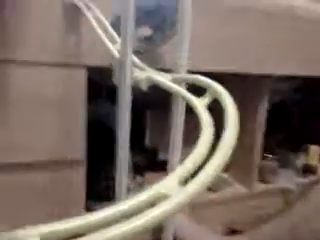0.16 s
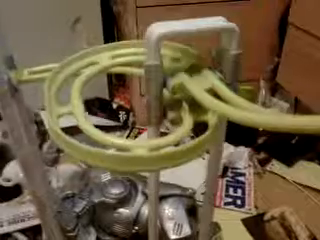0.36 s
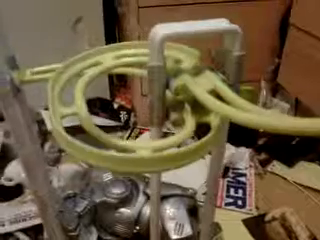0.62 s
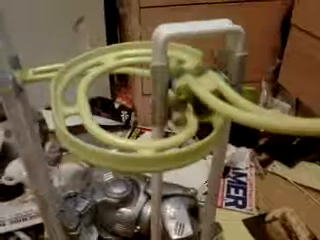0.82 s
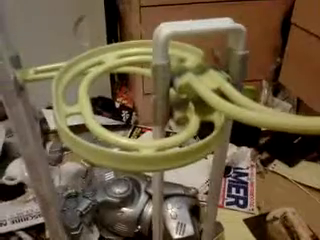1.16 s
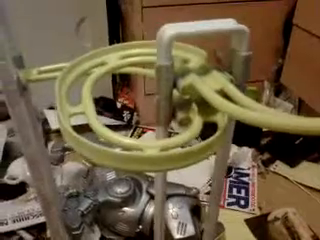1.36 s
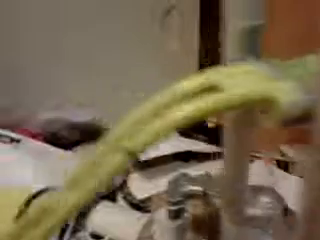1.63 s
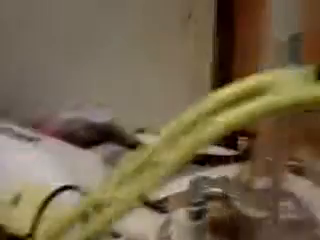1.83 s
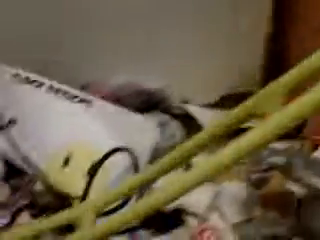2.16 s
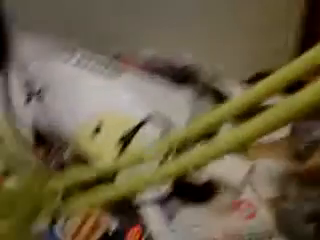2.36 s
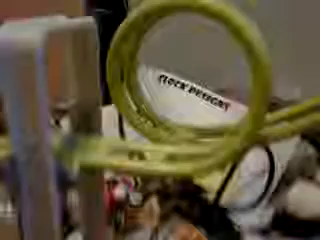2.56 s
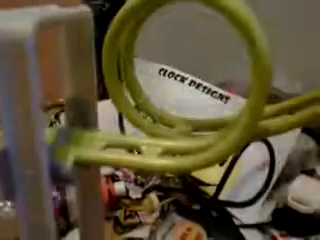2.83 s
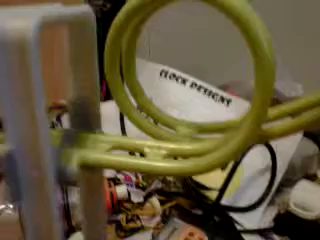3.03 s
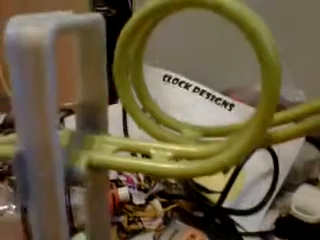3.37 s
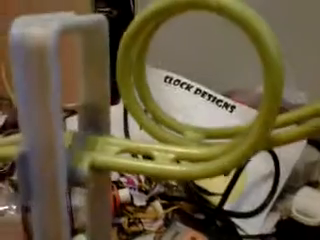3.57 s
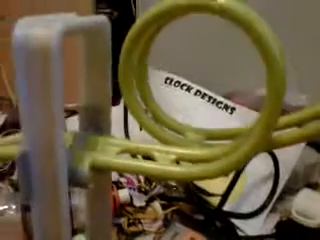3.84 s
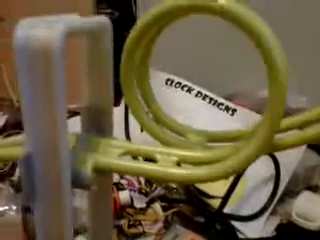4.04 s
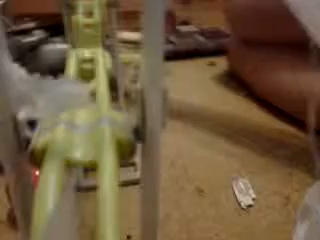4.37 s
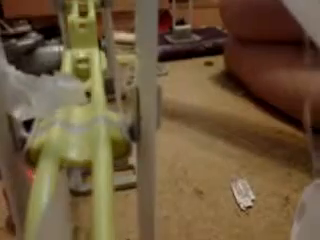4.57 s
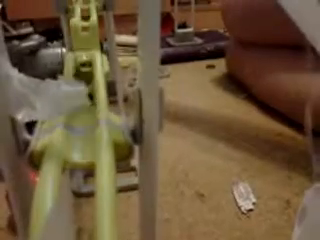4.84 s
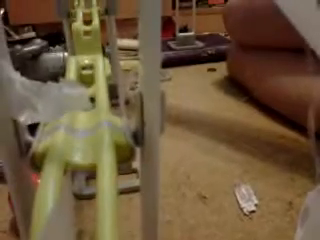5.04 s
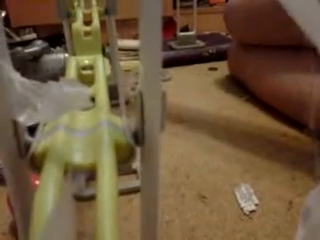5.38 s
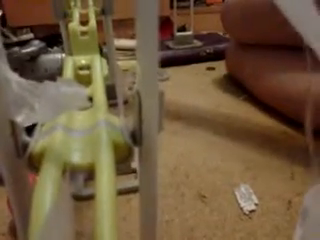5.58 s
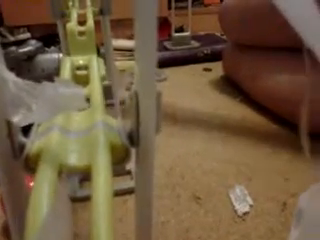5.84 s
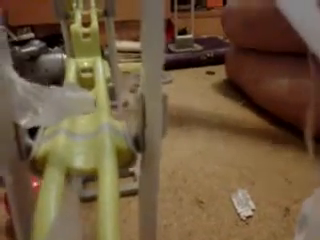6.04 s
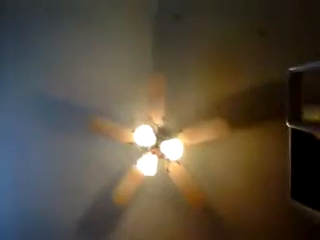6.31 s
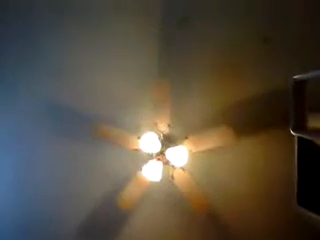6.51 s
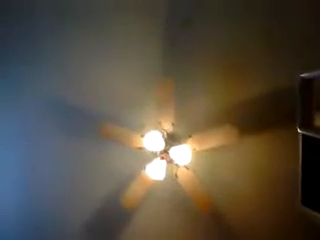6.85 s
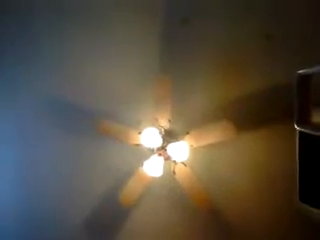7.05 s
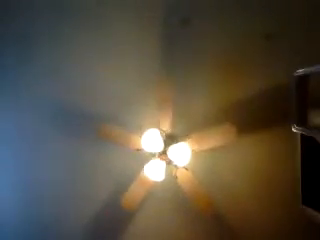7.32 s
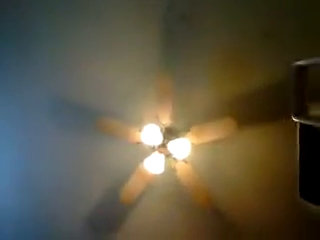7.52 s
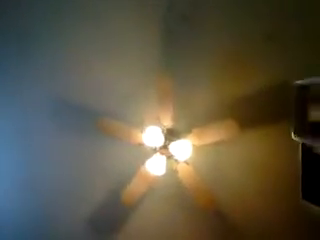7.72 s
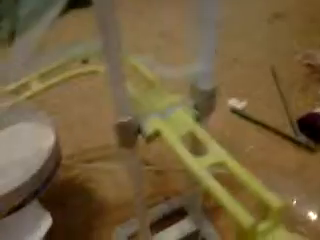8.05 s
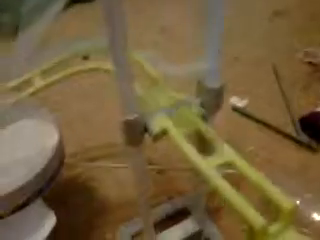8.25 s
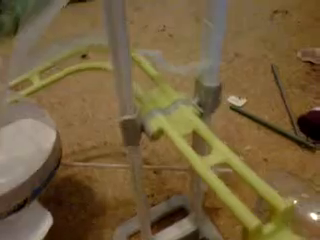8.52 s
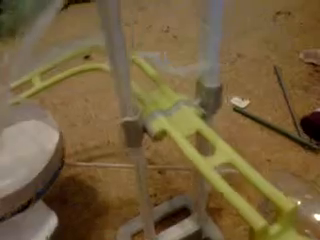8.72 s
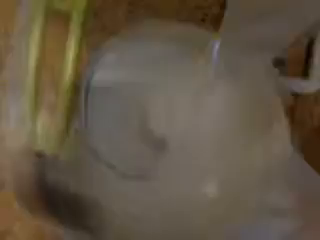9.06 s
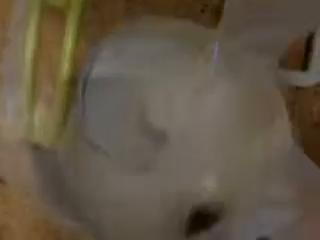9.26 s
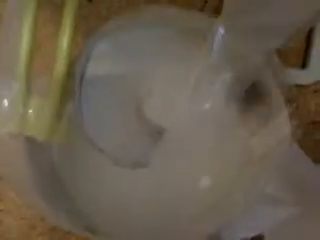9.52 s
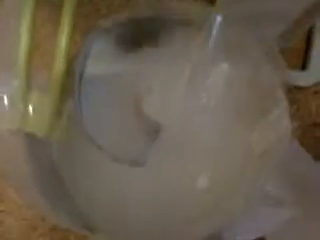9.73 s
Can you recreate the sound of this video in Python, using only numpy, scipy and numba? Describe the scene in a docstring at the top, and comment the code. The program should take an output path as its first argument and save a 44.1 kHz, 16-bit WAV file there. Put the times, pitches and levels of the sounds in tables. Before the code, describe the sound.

In a small cluttered room, a marble rolls down plastic rails with a grainy, hollow rattle that swells and fades. Sparse clicks come first, then a dense burst of hard clacks around the middle. Handling thumps on the camera follow, then more rattling and clacks, and finally a softer, duller roll around a bowl. The close handheld microphone sounds narrow and slightly muffled, over faint air and hiss.

```python
"""Marble on a toy track, hand-held camera

Small room, one microphone in the camera: a marble runs down plastic rails and ends circling a bowl.
Its rolling is a stream of tiny random impacts that ring the rails, coloured stretch by stretch.
At joints and drops it skips and clacks: a contact with chatter and room echo rings each spot's own resonances.
At no distance at all, fingers knock and rub on the case: short rings and trains of slips, both dry.
A dull pop, a small step and a swell of pressure, opens each new shot; faint air and hiss lie beneath.
"""
import sys
import numpy as np
from scipy import signal
from scipy.fft import rfft, irfft
from scipy.io import wavfile
from scipy.ndimage import uniform_filter1d
from numba import njit

SR = 44100
rng = np.random.default_rng(int(sys.argv[2]) if len(sys.argv) > 2 else 0)


def unload_audio(sound):
    """Save the sound as a 16-bit wav file, at the path given as the first command line argument."""
    columns = np.transpose(np.atleast_2d(sound))
    # keep every value between -1 and 1, then stretch to whole-number steps
    steps = np.round(np.clip(columns, -1, 1) * 32767)
    wavfile.write(sys.argv[1], SR, steps.astype(np.int16))


N = 436149
HIT = 16384  # length of one blow in samples
AGE = np.arange(HIT) / SR  # seconds since a blow
TIME = np.arange(N) / SR
TOP_HZ = 7500  # top of the band the microphone hears


def undb(db):
    """Decibels to gain."""
    return 10 ** (np.asarray(db) / 20)


def unit(x):
    """Scale to an energy of one."""
    return x / np.sqrt(np.sum(x ** 2) + 1e-18)


def level(x, db):
    """Scale to an rms level."""
    return unit(x) * np.sqrt(len(x)) * undb(db)


def add(out, s, x):
    """Mix x into out from time s."""
    i = max(int(s * SR), 0)
    out[i:i + len(x)] += x[:max(N - i, 0)]


def through(x, response):
    """Pass x through an impulse response."""
    return signal.fftconvolve(x, response)[:len(x)]


def butter(x, hz, kind, order=2):
    """Plain low-pass or high-pass."""
    return signal.sosfilt(signal.butter(order, hz, kind, fs=SR, output="sos"), x)


def steep(x, hz):
    """Steep low-pass."""
    return signal.sosfilt(signal.ellip(10, .2, 70, hz, fs=SR, output="sos"), x)


def colour(x, points, size=2048):
    """Causal filter whose gain follows (Hz, dB) points."""
    hz, db = np.transpose(points)
    bins = np.log(np.fft.rfftfreq(size, 1 / SR) + 1)
    gain = undb(np.interp(bins, np.log(hz), db))
    # folding the cepstrum gives minimum phase, so nothing sounds before the blow
    cepstrum = irfft(np.log(gain))
    cepstrum[1:size // 2] *= 2
    cepstrum[size // 2 + 1:] = 0
    return through(x, irfft(np.exp(rfft(cepstrum))))


def walk(count, rate):
    """Smooth chance with a spread near one, taking `rate` new values a second."""
    steps = np.arange(count) * rate / SR
    return np.interp(steps, np.arange(4096), rng.standard_normal(4096))


def grains(count, rate, spread_db):
    """Random tiny impacts of uneven size, `rate` a second on average."""
    happens = rng.random(count) < rate / SR
    return happens * rng.standard_normal(count) * undb(spread_db * rng.standard_normal(count))


def tail(t60):
    """Dense reflections dying away by 60 dB in t60 seconds."""
    return unit(rng.standard_normal(HIT) * undb(-60 * AGE / t60))


def resonance(hz, width, size=2048):
    """Response of one resonance, with a gain of one at its centre."""
    age = AGE[:size]
    ring = np.exp(-np.pi * width * age) * np.cos(2 * np.pi * hz * age)
    return np.pad(2 * np.pi * width / SR * ring, (0, HIT - size))


def body(modes, ring_db, detune):
    """Response of a struck thing: the contact itself plus its modes, detuned a little at random."""
    ring = np.zeros(HIT)
    for hz, width, db in modes:
        mode_hz = hz * (1 + detune * rng.standard_normal())
        ring += undb(db) * unit(np.exp(-np.pi * width * AGE) * np.cos(2 * np.pi * mode_hz * AGE))
    return unit((AGE == 0) + undb(ring_db) * ring)


def room(t60_low=0.26, t60_high=0.14, split_hz=650):
    """A small cluttered room, with its own decay for bass and treble."""
    low = butter(tail(t60_low), split_hz, "low", order=1)
    high = butter(tail(t60_high), split_hz, "high", order=1)
    return unit((low + high) * (1 - np.exp(-AGE / 0.0023)))


def blow(x, tone, tilt_hz, weight_db, hardness_db):
    """Colour a blow: a heavier one has more bass, a harder one more treble."""
    return colour(colour(x, tone), list(zip(tilt_hz, (weight_db, 0, hardness_db))))


# Colour of the air in the small room. Each row: frequency in Hz, gain in dB.
QUIET_TONE = [(18, -48.5), (30, -21.5), (85, -3.5), (115, -3), (155, -5), (296, -8.5), (340, -4.5),
              (390, -16), (459, -6.5), (7520, -37.5), (9780, -49), (16500, -120)]


def quiet_room(air_db=-67.5, waver_db=-2.0, hiss_db=-87.5, hiss_low_hz=1500, hiss_top_hz=4500):
    """Faint wavering air, as coloured noise, over steady band-limited microphone hiss."""
    air = level(colour(rng.standard_normal(N), QUIET_TONE), air_db)
    air = air * undb(waver_db * walk(N, rate=1.6))
    hiss = butter(butter(rng.standard_normal(N), hiss_low_hz, "high", order=1), hiss_top_hz, "low")
    return air + level(hiss, hiss_db)


def slips(length_s, slip_hz=365, jitter=.33, spread_db=2):
    """Skin sticks and lets go: an uneven train of pulses."""
    phase = np.cumsum(slip_hz * np.exp(jitter * walk(HIT, rate=slip_hz))) / SR
    pulses = np.diff(np.floor(phase), prepend=-1)
    return pulses * undb(spread_db * rng.standard_normal(HIT)) * (AGE < length_s)


# Ringing of the camera's case. Each row: frequency in Hz, width in Hz, level in dB.
CASE_MODES = [(360, 120, -8.5), (1190, 100, 0), (1650, 390, -6.5), (2780, 190, -0.5), (5440, 260, 14)]
# Fingers against the case, touching the microphone's housing; the row at 4.758 s is instead a dull thud that
# comes with the marble's clack just before it. # Each row: start in seconds, level in dB before colouring,
# weight (bass) in dB, hardness (treble) in dB, # pitch of the spot in Hz.
KNOCKS = [(0.273, -20, -22, -25, 2900), (0.288, -19.5, 9, -31, 1520), (0.3678, -17, -1, -37, 1560),
          (0.376, -11.5, -2, -32, 1800), (4.477, -2.5, 3, -16.5, 1440), (4.494, -20, 15.5, -6, 295),
          (4.5594, -37, 37.5, 8, 298), (4.758, -7, 19, -4.5, 300), (5.2949, 2.5, 10, -60, 395),
          (5.299, -12.5, 20, -23, 400), (5.427, -26, 31, -8, 300), (5.4613, -31.5, 37, -7, 298),
          (5.521, -23, 17, -9, 298), (6.0416, -34, 34, -10, 288), (6.1259, -5, -4.5, -19, 1960),
          (6.527, -4, -19.5, -16.5, 1800), (6.6911, -7.5, 4, -4, 5130), (7.077, -2.5, 13.5, -45, 1130),
          (7.1038, 3, -8, -33, 1150), (7.204, 17, -12, -52, 1064), (7.2078, 16, -0.5, -51, 1330),
          (7.307, 18, -10, -24.5, 1130), (7.309, 19, 0.5, -33, 1010), (7.3417, 7, 8.5, -44, 1200),
          (7.348, 2.5, 13.5, -63, 1194), (7.4576, 26.5, -4, -24.5, 1680), (7.9674, 7, 9, -31, 1250),
          (7.9827, -4.5, 9, -14, 1170), (7.995, -15, 13, -6, 1200), (8.012, -10.5, 13, -9, 1200)]
# Colour shared by all knocks. Each row: frequency in Hz, gain in dB.
KNOCK_TONE = [(50, -9), (280, -1), (780, -2.5), (1550, -2), (2950, 1.5), (5000, -1.5), (7500, -36.5)]
# Where weight and hardness act on a knock: bass in Hz, pivot in Hz, treble in Hz.
KNOCK_TILT_HZ = (280, 1630, 4900)
# Fingers slipping over the case. Each row: start in seconds, end in seconds, level in dB.
RUBS = [(7.076, 7.094, -29), (7.164, 7.201, -27), (7.203, 7.224, -25.5), (7.348, 7.361, -40)]
# Colour shared by all rubs. Each row: frequency in Hz, gain in dB.
RUB_TONE = [(90, -35.5), (290, 6.5), (550, -4.5), (1100, 6), (1700, -4.5), (2800, -17), (4000, -41),
            (7000, -66)]


def handling(spot_width_hz=435, spot_db=-6.5):
    """Knocks and stick-slip rubs reach the microphone through the case, so they are dry."""
    out = np.zeros(N)
    for s, db, weight_db, hardness_db, hz in KNOCKS:
        spot = unit(resonance(hz, spot_width_hz))
        case = body(CASE_MODES, ring_db=-7.0, detune=0.026)
        sound = case + undb(spot_db) * spot + tail(0.014) + undb(-30.0) * tail(0.065)
        add(out, s, undb(db) * blow(unit(sound), KNOCK_TONE, KNOCK_TILT_HZ, weight_db, hardness_db))
    for start, end, db in RUBS:
        case = body(CASE_MODES, ring_db=-22.0, detune=0.011)
        sound = colour(through(slips(end - start), case), RUB_TONE)
        add(out, start, unit(sound) * np.sqrt(abs(end - start) * SR) * undb(db))
    return out


# Stretches of the marble's rolling; a new row starts at a landing, a joint, a new shot
# or where the loudness trend changes.
# Each row: start in seconds, end in seconds, run-up in seconds, level in dB,
# speeding or slowing in dB per second, treble in dB relative to that level.
RUNS = [(0.389, 0.925, .01, -49, -20.5, -7.5), (0.931, 1.456, 0.0086, -56.5, 3, -11.5),
        (1.457, 1.634, 0.14, -55, -1, -2), (1.714, 2.33, 0.016, -61.5, -5, -19),
        (2.21, 2.739, .28, -52.5, 1.5, -4.5), (2.806, 3.146, 0.022, -57.5, 16, -2.5),
        (3.225, 3.251, 0.0075, -54, 9, 3), (3.414, 3.745, 0.0064, -50, -23.5, 0),
        (3.875, 4.496, .01, -68.5, 2, -8), (4.511, 4.666, .01, -50.5, 36.5, -8.5),
        (4.757, 4.797, 0.013, -56.5, -22, -9.5), (4.9, 4.987, .005, -42, -5, -8.5),
        (5.027, 5.202, 0.026, -41.5, -3, -1.5), (5.377, 6.187, .01, -59, 1, -10.5),
        (6.186, 6.412, .01, -69.5, 11.5, -10.5), (6.693, 7.193, 0.28, -51.5, 4, -6),
        (7.25, 7.317, .02, -52, -6.5, -3), (7.458, 7.523, .01, -53.5, 5, -0.5),
        (7.575, 7.75, 0.0038, -44.5, -22.5, -4), (7.919, 8.126, 0.011, -48.5, -5, -11.5),
        (8.199, 8.241, 0.0069, -51.5, 9, -9), (8.379, 8.719, 0.012, -47.5, -4, -14),
        (8.854, 9.248, 0.014, -65.5, 3, -3), (9.327, 9.89, .01, -62.5, 5.5, -14.5)]
# The roll swells over a bump or kink in the track. Each row: time in seconds, gain in dB.
BUMPS = [(.68, 2.5), (0.977, 13), (1.414, 8.5), (2.052, 18), (2.52, 5.5), (2.966, 6), (7.0, 4), (8.578, 4),
         (9.08, 0), (9.55, 5.5), (9.72, 7), (9.86, 2.5)]


def roll_gains(bump_s=0.032, dies_db_per_s=292, treble_growth=0.26):
    """Gains of the roll's bass and treble: each row fades in, follows a trend, swells on bumps, rings down."""
    swell_db = sum(db * np.exp(-((TIME - s) / bump_s) ** 2) for s, db in BUMPS)
    low, high = np.zeros(N), np.zeros(N)
    for start, end, run_up_s, db, db_per_s, treble_db in RUNS:
        here = slice(int(start * SR), int(end * SR) + HIT)
        age = TIME[here] - start
        ring_down_db = dies_db_per_s * np.maximum(TIME[here] - end, 0)
        change_db = db_per_s * age + swell_db[here] - ring_down_db
        drive = np.clip(age / run_up_s, 0, 1) * undb(change_db)
        # rows that overlap add as energies; a faster marble is brighter
        low[here] += (undb(db) * drive) ** 2
        high[here] += (undb(db + treble_db) * drive ** (1 + treble_growth)) ** 2
    return np.sqrt(low), np.sqrt(high)


def travelling(force, t60=0.044, scatter_db=-1, size=8192):
    """Waves echo between the joints of the rails in a pattern that shifts as the marble moves on."""
    out = np.zeros(N)
    window = np.sin(np.pi * np.arange(size) / size)
    for i in range(0, N - size // 2, size // 2):
        piece = force[i:i + size]
        echoes = (AGE == 0) + undb(scatter_db) * tail(t60)
        add(out, i / SR, signal.fftconvolve(piece * window[:len(piece)], echoes))
    return out


def ticks(rate=55, low_hz=700, high_hz=5000, width_hz=330, spread_db=3, tick_db=-9.0):
    """The marble taps the rails at random, and each spot it taps rings briefly at its own pitch."""
    out = np.zeros(N)
    for when, pitch, size in rng.random((int(rate * N / SR), 3)):
        ring = resonance(low_hz * (high_hz / low_hz) ** pitch, width_hz)
        add(out, when * N / SR, undb(spread_db * -np.log(size)) * ring)
    return level(out, tick_db)


def bending(x, lag_s=0.002038, lag_at_hz=1000, size=2048):
    """Bending waves carry the treble ahead of the bass, drawing each contact out into a short chirp."""
    hz = np.fft.rfftfreq(size, 1 / SR)
    turns = lag_s * np.sqrt(lag_at_hz) * (2 * np.sqrt(hz) - hz / np.sqrt(TOP_HZ))
    return through(x, irfft(np.exp(-2j * np.pi * turns))[:size // 2])


@njit
def band(x, hz, width):
    """Band-pass whose centre moves, with a gain of one at the centre."""
    y, b, low = np.empty(len(x)), 0., 0.
    for i in range(len(x)):
        g, k = np.tan(np.pi * hz[i] / SR), width / hz[i]
        v = (b + g * (x[i] - low)) / (1 + g * (g + k))
        b, low, y[i] = 2 * v - b, low + 2 * g * v, k * v
    return y


# A resonance of the rails slides as the marble travels between their supports, one curve per pass.
# Each row of a curve: time in seconds, frequency in Hz.
SLIDES = [
    [(0.45, 1120), (0.85, 844), (1.208, 720), (1.238, 1190), (1.502, 1070), (1.62, 1770)],
    [(2.3, 1200), (2.572, 1600), (3.212, 930), (3.224, 1150), (3.696, 1070), (3.72, 1500)],
    [(8.42, 1330), (8.528, 1630), (8.556, 1430), (8.62, 1514), (8.648, 1338), (8.72, 1530)],
]


def sliding(x, width_hz=360.0, slide_db=-3):
    """Lift the resonance that slides along with the marble."""
    out = x.copy()
    for curve in SLIDES:
        s, hz = np.transpose(curve)
        here = slice(int(s[0] * SR), int(s[-1] * SR))
        out[here] += undb(slide_db) * band(x[here], np.interp(TIME[here], s, hz), width_hz)
    return out


# Ringing of the plain rails, then of the pieces with a shape of their own.
# Each row: frequency in Hz, width in Hz, level in dB.
RAIL_MODES = [(483, 420, 2), (1353, 49, 8), (1800, 190, 2.5), (2600, 140, 6.5), (2850, 130, 2),
              (4176, 49, -8.5), (5087, 110, -3.5)]
RAMP_MODES = [(417, 16, 20), (642, 40, 16), (900, 84, 8.4)]
LOOP_MODES = [(1130, 41, 2.6), (1348, 42, 4.6), (2520, 160, 10.3), (5180, 250, 11)]
CHUTE_MODES = [(310, 320, 5.4), (1431, 49, 15), (2533, 55, 14), (2990, 86, 12), (3200, 60, 5),
               (3930, 90, 4), (4890, 120, 5.5)]
BOWL_MODES = [(637, 53, 11.5), (750, 78, 11.4), (825, 39, 8.5), (1236, 69, 13.6), (1366, 45, 13),
              (1500, 50, 9)]
# Colour of each stretch of track. Each row: frequency in Hz, gain in dB.
SPIRAL_TONE = [(50.0, -9), (212.0, -11), (398.0, 5.5), (481.0, -4.5), (790, 4), (1090, -5), (1320.0, 0),
               (3700, -29.5), (4300, -35.5), (5350.0, -32), (7500.0, -75)]
RAMP_TONE = [(50.0, -31), (330.0, -17), (398.0, 5), (1240.0, -3.5), (2040.0, -12), (2800.0, -10),
             (3180.0, -18), (4080.0, -19), (7500.0, -65)]
LOOP_TONE = [(50.0, -28.5), (106.0, 5.5), (257.0, 0.5), (546.0, 12), (702.0, 6.5), (1160.0, 6.5),
             (1720, 7.5), (2040.0, -4), (2470.0, -2.5), (3550, -7), (4400, -14.5), (5250.0, -22.5),
             (6750.0, -30.5), (7500.0, -58.5)]
CHUTE_TONE = [(50.0, -31), (106.0, -1.5), (291.0, -3), (398.0, 1), (702.0, -6.5), (848.0, -4),
              (1160.0, -5.5), (1900, -3), (3380.0, -7), (6000, -32), (7500.0, -50.5)]
RUNOUT_TONE = [(50.0, -22), (146.0, -0.5), (512.0, 1.5), (619.0, -3.5), (1800.0, -3.5), (3400, -16),
               (5000, -27.5), (7500.0, -51.5)]
BEND_TONE = [(50.0, -25), (106.0, -8.5), (199.0, -3.5), (273.0, -14), (620, 0), (961.0, -4), (1400.0, -1),
             (3180.0, -3), (4350.0, -11), (6340.0, -24), (7190.0, -60), (7500.0, -64.5)]
BOWL_TONE = [(29, -50.5), (50, -15), (285, -1.5), (461, -5), (730, 1), (1210, -12.5), (1560, -17),
             (2040, -35), (2740, -41), (7500, -71), (9750, -71.5), (16500, -120)]
# Where the marble is. Each row: start in seconds, end in seconds, colour, modes.
STRETCHES = [(.4, 1.66, SPIRAL_TONE, RAIL_MODES), (1.66, 2.28, RAMP_TONE, RAMP_MODES),
             (2.28, 4.52, LOOP_TONE, LOOP_MODES), (4.52, 5.35, CHUTE_TONE, CHUTE_MODES),
             (5.35, 6.42, RUNOUT_TONE, RAIL_MODES), (6.42, 8.95, BEND_TONE, RAIL_MODES),
             (8.95, 9.89, BOWL_TONE, BOWL_MODES)]


def rolling(spread_db=3.5, skip_db=-8, skip_growth=0.2, split_hz=2300):
    """The marble trips over fine roughness and skips more as the roll grows, voiced by each stretch."""
    low_gain, high_gain = roll_gains()
    liveliness = (low_gain / np.median(low_gain)) ** skip_growth
    roughness = unit(grains(N, rate=4000, spread_db=spread_db))
    skips = unit(grains(N, rate=180, spread_db=-0.5)) * undb(skip_db) * liveliness
    force = roughness + skips
    # even out the loudness, so that skipping changes only the grain
    force = force / np.sqrt(uniform_filter1d(force ** 2, size=4096) + 1e-18)
    rails = sliding(bending(travelling(force) + ticks() * liveliness))
    out = np.zeros(N)
    for start, end, tone, modes in STRETCHES:
        here = slice(int(start * SR), int(end * SR))
        sound = colour(through(rails[here], body(modes, ring_db=-39.0, detune=.001)), tone)
        low = level(butter(sound, split_hz, "low", order=5), 0)
        high = level(butter(sound, split_hz, "high", order=5), 0)
        out[here] = low * low_gain[here] + high * high_gain[here]
    return out


# Pop at the start of a shot. Each row: start in seconds, swell in dB and leading tick in dB, both unfiltered.
POPS = [(.397, -21.5, -22.5), (1.6571, -22, -24), (2.817, -21, -43), (4.518, -22, -29), (6.417, -21.5, -35),
        (8.036, -22, -22), (9.216, -22.5, -18.5)]


def pops(lag_s=0.00365, width_s=0.00092, tick_s=0.00014, bass_hz=32, dull_hz=900):
    """A small downward step, then a swell of pressure that the low-pass rounds."""
    out = np.zeros(N)
    for s, swell_db, tick_db in POPS:
        swell = undb(swell_db) * np.exp(-abs(AGE - lag_s) / width_s)
        tick = undb(tick_db) * np.exp(-AGE / tick_s)
        add(out, s, swell - tick)
    return butter(butter(out, bass_hz, "high", order=1), dull_hz, "low", order=1)


# Marble against track; each spot of the track has two resonances of its own.
# Each row: start in seconds, relative level in dB, weight (bass) in dB, hardness (treble) in dB,
# rattle in dB, relative room echo in dB, lower ring in Hz, upper ring in Hz, ring in dB.
CLACKS = [(0.497, -17, 8, 4.5, 27, -2.5, 1050, 3660, -3), (2.022, -7, -16.5, -14, 4, -7, 450, 1800, -12),
          (2.717, -4, 4.5, -36, 0, -8, 1590, 1750, -10), (2.743, -17, 4, 9, -5, -25, 1740, 4330, 13),
          (2.7995, -11.5, 7, 3, 2, -26, 1730, 4400, 11.5), (2.967, -13, 2, 12.5, 21, -19, 1150, 2600, -8),
          (3.158, -6, 3, -4.5, 25, -8, 750, 3340, -4), (3.247, -13.5, 8, 14.5, 45, -8.5, 1380, 2550, 5.5),
          (3.413, -5, 2, 11, 28, -25, 2470, 4950, -6), (3.418, -7.5, 5, 2.5, 5, 1, 920, 2520, -11),
          (3.71, -17, 1, -9.5, -9, -0.5, 2140, 3200, 17.5), (3.8631, -5, 4, 2, -7, -1, 1840, 3010, 8.5),
          (4.677, 0.5, -12, -12, 12, -24, 1015, 1850, -9), (4.744, -3, -0.5, 5, 24, -5, 2460, 2970, 11.5),
          (4.749, 1, 7.5, -7, 13, -9, 1410, 3000, 2), (4.9053, 4.5, 5.5, 11, 12, -17.5, 2640, 3020, -1),
          (4.914, -3, 8.5, 11, -7, -22, 1510, 2200, 15.5), (4.9453, -3, -3.5, 7, 12, -15, 1430, 2980, 13.5),
          (4.986, 1, -2, -2, 11, -31, 1720, 3200, 11.5), (4.991, 3, 1, -10, 20, -25, 750, 2450, 8),
          (5.0438, 0.5, 2.5, 7, -7.5, -30, 1740, 3430, 15),
          (5.0903, 9.5, -7.5, -7.5, -5, -13.5, 1830, 2710, 2),
          (5.2129, 1, -10, -11.5, 14, -22, 1960, 2760, 15),
          (5.224, -0.5, -8, -12.5, -6, -12, 1360, 2150, 11), (5.244, -11, -5, -5, -10, -22, 1700, 3300, 2),
          (5.2576, -8.5, -2, -1.5, -16, -5, 2620, 3320, 12),
          (5.377, 17, -11, -13, -12, -17.5, 1330, 1900, 4.5),
          (5.3823, -2, 1.5, 10.5, -1, -19, 1800, 2380, 17.5),
          (5.4209, -5, 1.5, -9, -7, -15, 1380, 2900, -8), (5.437, -15, 11, 5, -8, -12, 1370, 2830, 6),
          (6.058, -16, 5, -2, 2, -15, 1390, 1800, 2), (7.007, -13, 2, 10.5, 6, -18, 1220, 2660, -10),
          (7.2897, 0.5, -3.5, -3, 9, -4, 2670, 5250, 11), (7.53, -9, 0, -1.5, 10, -4, 1450, 2600, 2),
          (7.578, -11.5, 6.5, 13, 26, -21, 1710, 4190, 18), (7.629, 1, -12.5, -17, 16, -23, 1570, 2180, 1),
          (7.7465, -8, -3, -15, 2, -15, 2000, 3540, 16.5), (7.758, -8, -13, -12, -17, -25, 1460, 2070, 13),
          (7.7752, -8.5, -3, 3.5, -3, -2, 1980, 3680, 3), (7.9079, 4.5, -3.5, 1, 2, -7.5, 1440, 1730, 4.5),
          (8.133, -7.5, -1.5, -10.5, 15, -12.5, 680, 2260, 15.5),
          (8.2262, -12, 0, 4, 11, -3.5, 1500, 3100, 5.5), (8.3903, 0.5, -2, 3.5, 15, -7.5, 1520, 4200, 9.5),
          (8.459, -5, -4, -7, 6, -24, 1400, 3200, 7.5), (8.5128, -5.5, -7.5, -2, 1, -4, 1450, 4500, 4),
          (8.6932, -5, -19, -16.5, -6, -21, 1410, 2500, 13.5),
          (8.71, -10.5, -3.5, -13.5, -10, -21, 2320, 3500, 18),
          (8.8457, 11.5, -9.5, -12, -4, -6, 1660, 2000, -4),
          (9.3161, 5, 2.5, -0.5, 3.5, -7.5, 740, 2660, -7.5)]
# Colour shared by all clacks. Each row: frequency in Hz, gain in dB.
CLACK_TONE = [(50, -6.5), (280, 2), (780, 1.5), (1550, -1), (2950, -2), (5000, -14), (7500, -34)]
# Where weight and hardness act on a clack: bass in Hz, pivot in Hz, treble in Hz.
CLACK_TILT_HZ = (616, 1670, 3000)


def clacks(rattle_s=0.0076, linger=0.06, clack_db=-1.13, echo_db=2, ring_db=-26, width_hz=161, bass_hz=70):
    """A hard first contact, then the struck spot rings, the loose joints chatter and the room answers."""
    out = np.zeros(N)
    for s, db, weight_db, hardness_db, rattle_db, room_db, lower_hz, upper_hz, spot_db in CLACKS:
        decay = rattle_s * undb(linger * rattle_db)  # looser joints chatter for longer
        fade = np.exp(-AGE / decay) * (AGE < 3 * decay)
        chatter = unit(grains(HIT, rate=2500, spread_db=0.5) * fade)
        force = unit((AGE == 0) + undb(rattle_db) * chatter)
        force = force + undb(room_db + echo_db) * room()
        modes = next(modes for start, end, tone, modes in STRETCHES if s < end)
        spot = resonance(lower_hz, width_hz) + resonance(upper_hz, width_hz)
        sound = through(force, body(modes, ring_db, detune=.003) + undb(spot_db) * spot)
        add(out, s, undb(db + clack_db) * blow(sound, CLACK_TONE, CLACK_TILT_HZ, weight_db, hardness_db))
    return butter(bending(out), bass_hz, "high")


def scene():
    """Marble, hands, pops and room at one microphone."""
    marble = rolling()
    marble = marble + undb(-8.0) * through(marble, room())
    return (marble + clacks() + handling() + pops() + quiet_room())[None]


def record(dry):
    """The camera rounds loud peaks and hears a narrow band; overloads past the knee snap above that band."""
    rounding, knee, squash, snap_top_hz = .72, .66, .2, 16000
    heard = steep(rounding * np.tanh(dry / rounding), TOP_HZ)
    overload = heard - np.clip(heard, -knee, knee)
    return steep(heard - squash * overload, snap_top_hz)


dry = scene()
out = record(dry)
unload_audio(out)
```